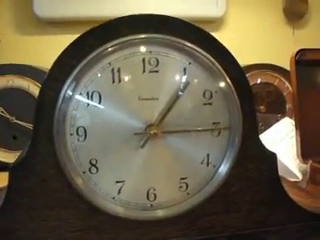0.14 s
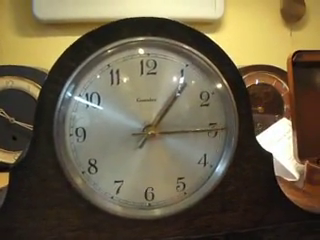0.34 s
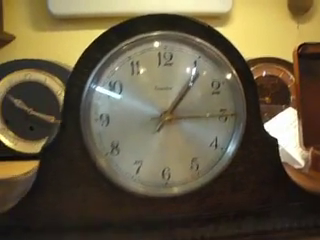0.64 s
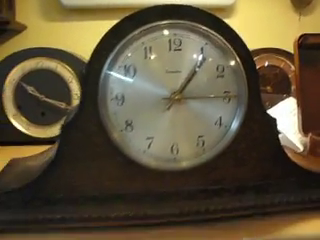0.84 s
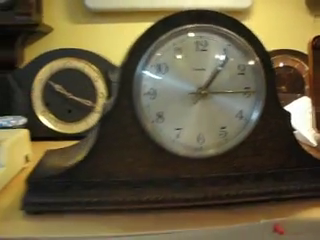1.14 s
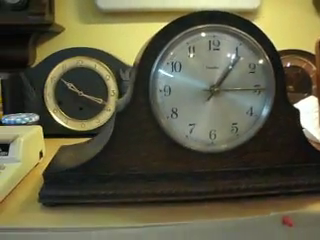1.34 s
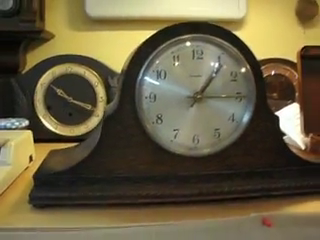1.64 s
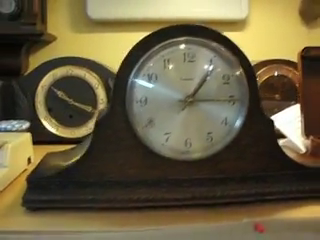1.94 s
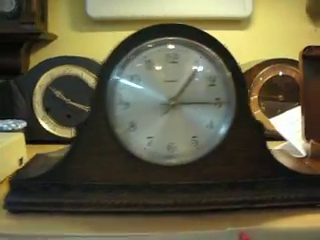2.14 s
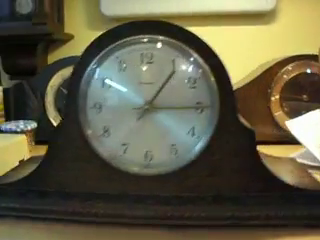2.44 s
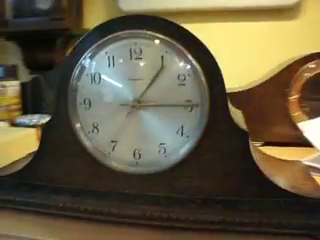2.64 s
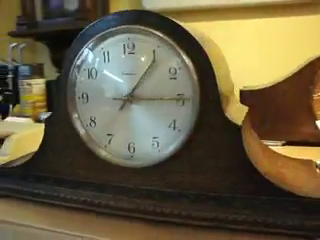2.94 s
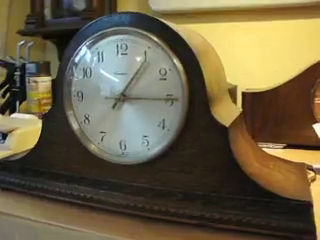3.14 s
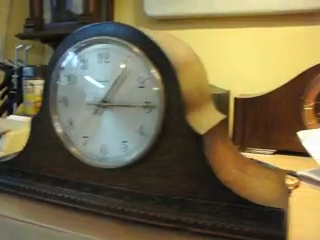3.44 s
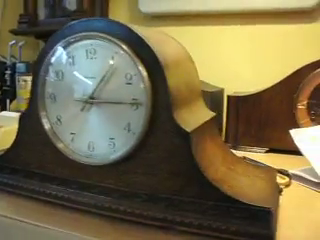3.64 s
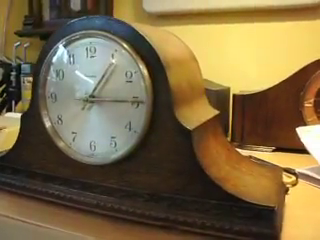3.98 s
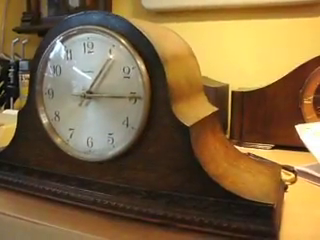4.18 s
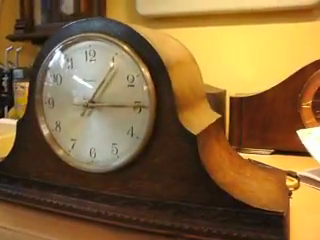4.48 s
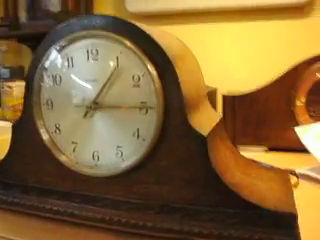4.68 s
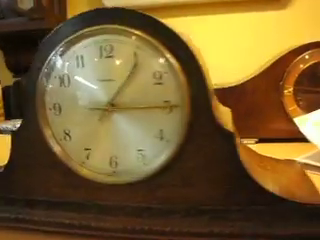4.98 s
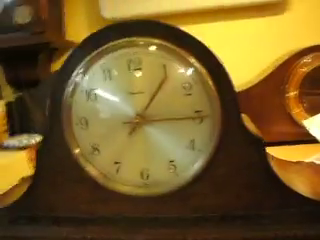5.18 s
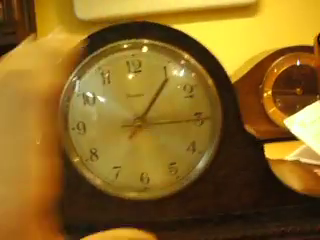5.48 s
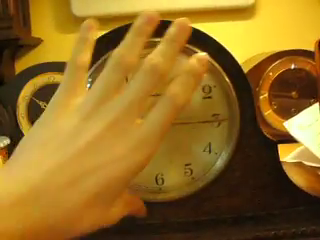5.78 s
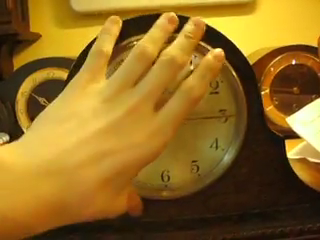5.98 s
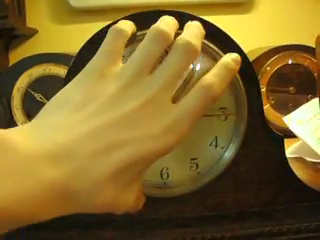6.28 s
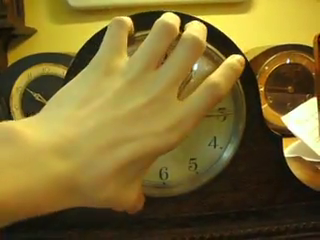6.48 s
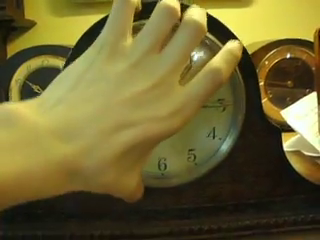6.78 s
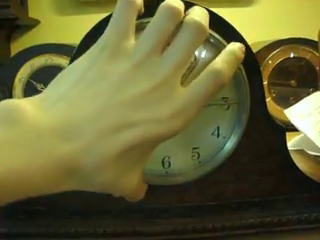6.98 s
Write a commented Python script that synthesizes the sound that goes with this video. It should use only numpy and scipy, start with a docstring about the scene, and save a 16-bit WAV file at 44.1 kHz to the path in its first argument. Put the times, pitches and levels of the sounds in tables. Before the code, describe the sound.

Quick, overlapping, echoey ticks run throughout, wooden and steely, with faint dull shuffles behind. A sharp clack a third of the way in leaves a short room tail. Later a cluster of very close, crisp snaps and scratchy rubs ends in a tiny judder. Soft hollow taps on glass precede a loud woody knock with rattling bezel and faint gong-rod ring. Band-limited handheld microphone, constant hiss.

```python
"""Several mantel clocks tick out of step throughout: decaying noise and ringing modes, over steady hiss and hum.
Dull shuffles of band noise begin in the room, then a hard clack sounds further off with its room tail.
Fingers click and rub close to the microphone: damped resonances, and stick-slip grains along each stroke.
Fingertips tap the glass of the nearest clock as short hollow pings with a little echo; last, a hand
knocks its door, whose modes and loose bezel sound at once while the gong rods ring on faintly."""
import sys
import numpy as np
from scipy import signal
from scipy.fft import rfft, irfft
from scipy.io import wavfile

SR = 44100
rng = np.random.default_rng(int(sys.argv[2]) if len(sys.argv) > 2 else 0)


def put_to_file(sound):
    """Save the sound as 16-bit audio at rate SR, in the file named by the first command-line argument."""
    columns = np.atleast_2d(sound).T  # one column per channel
    safe = np.clip(columns, -1, 1)
    whole_steps = np.round(safe * 32767)
    wavfile.write(sys.argv[1], SR, whole_steps.astype(np.int16))


N = 313992
TIME = np.arange(N) / SR

# Spectrum of the wooden case's tick. Each row: frequency in Hz, relative density in dB per Hz.
TICK_CASE_COLOUR = [(200, -25), (600, -7), (1300, -6.5), (1900, -5), (2500, 0.5), (2900, -3.5), (3400, -24)]
# Spectrum of the steel works' tick. Each row: frequency in Hz, relative density in dB per Hz.
TICK_STEEL_COLOUR = [(1500, -19), (2600, -16), (3100, 3), (3700, 2.5), (4000, -3), (4300, -1)]
# Sharp resonances of the clock works. Each row: frequency in Hz, relative level in dB, 60 dB decay in s.
WORKS_MODES = [(2345, -1.5, 0.059), (2464, -2, 0.048), (2630, 0.5, 0.15), (2910, 4.5, 0.028)]


def clocks(pitched_db=-9.0, pitched_t60=0.27, pitched_rise_s=0.0061, width_hz=700):
    """Impulsive excitation: each beat rings a pitched case and the steel works, heard mostly as room echo."""
    ticks = beats()
    times, case_db, steel_db, _ = np.transpose(ticks)
    works = rms_one(ring(rng.standard_normal(N), WORKS_MODES))
    case_wash = noise(TICK_CASE_COLOUR) + from_db(-5.5) * works
    out = from_db(-9) * dying(taps(times, case_db), t60=0.39, rise_s=0.0026) * case_wash
    out += from_db(-3) * dying(taps(times, steel_db), t60=0.31, rise_s=0.0023) * noise(TICK_STEEL_COLOUR)

    # a narrow band of noise at the case pitch of each beat
    t = TIME[:SR // 2]
    swell = (1 - np.exp(-t / pitched_rise_s)) * from_db(-60 * t / pitched_t60)
    whites = rng.standard_normal((len(ticks), len(t)))
    for (at, db, _, hz), white in zip(ticks, whites):
        band = band_noise(white, hz - width_hz / 2, hz + width_hz / 2)
        tick = from_db(db + pitched_db) * swell * rms_one(band)
        start = max(int(at * SR), 0)
        out[start:start + len(t)] += tick[:N - start]
    return out


# The clocks, each at its own steady rate. Each row: first tick in seconds, full swing in seconds,
# tick to tock in seconds, relative tick level in dB, relative tock level in dB,
# steel ring over case ring in dB, case pitch in Hz.
CLOCKS = [(0.2755, 0.602, 0.301, -29.5, -28.5, -8.5, 2350), (0.671, 1.522, 0.76, -29.5, -42.5, -2.5, 2700),
          (-0.004, 1.512, 0.757, -34, -43, 1, 2650), (0.008, 0.73, 0.592, -35.5, -37, -7.5, 2400)]
# Further single ticks, loud and soft, at irregular times. Each row: start in seconds, relative level in dB,
# steel ring over case ring in dB, case pitch in Hz.
SINGLE_TICKS = [(0.487, -31.5, -5, 2080), (0.8485, -28.5, -5, 1830), (1.722, -35, -4, 1950),
                (1.9135, -34, -4, 2550), (2.5381, -32, -5, 2370), (2.653, -31, -4, 1810),
                (2.7667, -33.5, -8, 1840), (3.5395, -25.5, -3, 3150), (3.6713, -29, -6.5, 2340),
                (3.92, -28, -4.5, 2670), (4.1207, -29.5, -5, 2650), (4.2684, -34, -1.5, 2490)]
# Level of all the ticking as the microphone moves about. Each row: time in seconds, gain in dB.
TICKING_GAIN = [(0.1, -0.5), (0.7, 2), (1.3, -0.5), (1.8, -1.5), (2.1, 1), (2.8, 0.5), (3.7, -1),
                (4.3, 0.5), (5.4, -0.2), (5.7, -3), (6.05, -0.5), (6.3, -1.5), (6.6, 0.5)]


def beats(uneven_db=0.6):
    """Periodic motion: tick and tock recur at fixed intervals; rows of s, case dB, steel dB, pitch Hz."""
    rows = list(SINGLE_TICKS)
    for first, swing, tock_s, tick_db, tock_db, steel_db, hz in CLOCKS:
        # each tick and tock of a clock differs a little in strength
        for k, (tick_uneven, tock_uneven) in enumerate(rng.normal(0, uneven_db, size=(13, 2))):
            tick_at = first + k * swing
            rows.append((tick_at, tick_db + tick_uneven, steel_db, hz))
            rows.append((tick_at + tock_s, tock_db + tock_uneven, steel_db, hz))
    heard = [row for row in rows if row[0] < TIME[-1]]
    times, db, steel_db, hz = np.transpose(heard)
    db = db + np.interp(times, *np.transpose(TICKING_GAIN))
    return np.transpose([times, db, db + steel_db, hz])


# Hand on the glass door. Each row: start in seconds, then the relative levels of ring, rattle
# and low thump in dB.
KNOCKS = [(6.7848, -6.3, -9, -44), (6.8022, -2.8, -7.5, -11), (6.8062, -7.5, -7.5, -8.5)]
# Door and wooden case. Each row: frequency in Hz, relative level in dB, 60 dB decay in seconds.
DOOR_MODES = [(377, -22, 0.77), (461.6, -21, 0.27), (622, -19.5, 0.24), (656, -12, .22), (677, -17, .25),
              (748, -15, 0.12), (806, -5.5, 0.1), (847, -5, .14), (925, -9, 0.14), (1220, -26, 0.2),
              (1270, -25, 0.16), (1464, -18, 0.061), (1810, -26, 0.2), (2110, -27, 0.16),
              (2280, -23.5, 0.206), (2920, -26, 0.22)]
# Spectrum of the loose bezel. Each row: frequency in Hz, relative density in dB per Hz.
RATTLE_COLOUR = [(70, -27), (200, -11), (450, -2), (750, 4), (1100, 0.5), (1800, 1.5), (2800, -1),
                 (4200, -5.5)]
# Boom of the hollow case in the room. Each row: frequency in Hz, relative density in dB per Hz.
BOOM_COLOUR = [(120, -19), (190, -5.5), (300, -8), (390, 4.5), (470, -2), (530, -21), (680, 4), (900, -3.5),
               (1050, -12), (1300, -11), (1600, -20)]
# Gong rods shaken by the last knock. Each row: frequency in Hz, level in dB, 60 dB decay in seconds.
GONG_MODES = [(420, -33.5, 1.1), (837, -37, 1.9), (1053, -43, 2.2), (1314, -35, 0.67), (2110, -42.5, 2.3)]


def door():
    """Modal excitation: a knock rings glass, case and gong rods, rattles the bezel and is answered by the room."""
    times, ring_db, rattle_db, thump_db = np.transpose(KNOCKS)
    body = ring(taps(times, ring_db), DOOR_MODES) + thump(taps(times, thump_db), width_s=0.0018)
    rattle_force = taps(times, rattle_db)
    rattle = dying(rattle_force, t60=0.06, rise_s=0.0011) * noise(RATTLE_COLOUR)
    tail = from_db(-17.0) * dying(rattle_force, t60=0.48, rise_s=0.0053) * noise(RATTLE_COLOUR)
    boom = from_db(-23) * dying(taps(times, ring_db), t60=0.41, rise_s=0.006) * noise(BOOM_COLOUR)
    gong = ring(taps(times[-1:], 0), GONG_MODES)
    return body + rattle + tail + boom + gong


# Fingertips landing on the glass, which they damp. Each row: start in seconds, level in dB, pitch in Hz.
TOUCHES = [(6.1458, -21, 834), (6.1535, -30, 800), (6.7345, -33, 790), (6.757, -18, 713),
           (6.762, -14.5, 850), (6.767, -26, 680)]
# Echo of a fingertip on the glass. Each row: frequency in Hz, relative density in dB per Hz.
TOUCH_COLOUR = [(90, -11.5), (350, -3), (800, 3.5), (1300, -3), (1900, -12)]


def fingertips(swell_s=0.0022, echo_db=-14):
    """Heavy damping: soft pads give the glass only a short hollow tap and a little echo."""
    times, level_db, _ = np.transpose(TOUCHES)
    direct = sum(ping(at, hz, db, swell_s) for at, db, hz in TOUCHES)
    echo = dying(taps(times, level_db), t60=0.28, rise_s=0.0016) * noise(TOUCH_COLOUR)
    return direct + from_db(echo_db) * echo


# Dry clicks of the grip next to the microphone. Each row: start in seconds, snap pitch in Hz,
# snap level in dB, body pitch in Hz, body level in dB.
CLICKS = [(3.2077, 1680, -11, 840, -16.5), (3.2087, 3500, -15, 2260, -21),
          (3.2168, 3300, -14.5, 700, -27.5), (3.408, 2940, -22, 1710, -38), (4.638, 3400, -19, 1200, -24),
          (4.6648, 2000, -9, 840, -10.5), (4.667, 3460, -8.5, 1500, -12.5), (4.681, 2740, -8, 1070, -14),
          (4.7123, 2700, -21, 1100, -32), (4.7395, 2850, -10, 1090, -19), (4.9036, 3480, -20.5, 1200, -37),
          (4.9488, 3080, -23, 1900, -29.5), (4.982, 3060, -12, 1700, -24), (5.005, 3080, -13, 2100, -20)]
# Low thumps as the loudest clicks overload the microphone. Each row: start in seconds, relative level in dB.
THUMPS = [(4.665, -12.5), (4.6814, -38), (4.7395, -43), (5.0487, -32.5)]


def grip_clicks(snap_s=0.00054, body_s=0.00097, edge_db=-7, edge_hz=3900, edge_s=0.00045):
    """Sudden release: the shell in the hand snaps in short sharp-edged clicks, pitched by where it gives."""
    out = np.zeros(N)
    for at, snap_hz, snap_db, body_hz, body_db in CLICKS + judder():
        out += ping(at, snap_hz, snap_db, snap_s)
        out += ping(at, body_hz, body_db, body_s)
        out += ping(at, edge_hz, snap_db + edge_db, edge_s)
    return out + thump(taps(*np.transpose(THUMPS)), width_s=0.0023)


# the grip judders in a quick run of clicks as the last stroke ends
JUDDER_START_S, JUDDER_GAP_S, JUDDER_LOSS_DB = 5.0444, 0.0045, 1.2
# centres of the snap and body, varied from click to click
JUDDER_SNAP_HZ, JUDDER_SNAP_DB, JUDDER_BODY_HZ, JUDDER_BODY_DB = 3190, -7.5, 1000, -23


def judder(count=4):
    """Repeated release: evenly spaced snaps, each a little weaker; rows as in CLICKS."""
    rows = []
    for k, (detune, shift, uneven) in enumerate(rng.standard_normal((count, 3))):
        at = JUDDER_START_S + k * JUDDER_GAP_S
        snap_hz = JUDDER_SNAP_HZ * (1 + 0.02 * detune)
        snap_db = JUDDER_SNAP_DB - k * JUDDER_LOSS_DB
        body_hz = JUDDER_BODY_HZ * 2 ** (0.47 * shift)
        rows.append((at, snap_hz, snap_db, body_hz, JUDDER_BODY_DB + 2 * uneven))
    return rows


# Spectrum of the friction. Each row: frequency in Hz, relative density in dB per Hz.
RUB_COLOUR = [(200, -19), (900, -7.5), (1900, -8.5), (2500, -5), (3100, -5.5), (3700, -6.5), (4300, -2)]
# Resonances of the grip under a sliding finger. Each row: frequency in Hz, relative level in dB,
# 60 dB decay in seconds.
RUB_MODES = [(2880, -1.5, 0.005), (3250, -0.5, .008), (3710, -3, 0.0056)]
# the skin catches now and then: rate, level over the friction, spread of levels and pitch
CATCHES_PER_S, CATCH_DB, CATCH_SPREAD_DB, CATCH_HZ = 70, 4, 3, 3150


def grip_rub(slips_per_s=2000, spread_db=3.0, scrape_db=-4, ring_db=-2, catch_s=0.00041):
    """Stick-slip friction: dense uneven grains set the grip ringing, and stray catches add small snaps."""
    slips = (rng.random(N) < slips_per_s / SR) * rng.choice([-1, 1], N)
    slips = slips * from_db(spread_db * rng.standard_normal(N))
    scrape = from_db(scrape_db) * coloured(slips, RUB_COLOUR)
    ringing = from_db(ring_db) * rms_one(ring(slips, RUB_MODES))
    catches = (rng.random(N) < CATCHES_PER_S / SR) * from_db(CATCH_SPREAD_DB * rng.standard_normal(N))
    snap = ping(0, CATCH_HZ, CATCH_DB, catch_s)[:SR // 20]
    snaps = signal.fftconvolve(catches, snap)[:N]
    return friction() * (rms_one(scrape + ringing) + snaps)


# Strokes of skin sliding on the grip. Each row: start in seconds, length in seconds,
# friction at the start in dB, friction at the end in dB.
STROKES = [(4.395, 0.083, -32, -25), (4.636, 0.065, -26, -34.5), (4.71, 0.057, -36, -31.5),
           (4.773, 0.022, -26.5, -22), (4.801, 0.045, -26.5, -32.5), (4.851, 0.031, -32, -25.5),
           (4.974, 0.03, -35.5, -33), (5.01, 0.051, -28, -21.5)]
# the attack leads up to the start; the release is a time constant
STROKE_ATTACK_S, STROKE_RELEASE_S = 0.005, 0.0043


def friction():
    """Sliding contact: each stroke takes hold quickly, grows or fades evenly in dB and lets go."""
    out = np.zeros(N)
    for start, length, first_db, last_db in STROKES:
        t = TIME - start
        attack = np.clip(t / STROKE_ATTACK_S + 1, 0, 1)
        release = np.exp(-np.clip((t - length) / STROKE_RELEASE_S, 0, 20))
        level = from_db(np.interp(t, [0, length], [first_db, last_db]))
        out = np.maximum(out, attack * release * level)
    return out


# A hard clack across the room. Each row: start in seconds, relative level in dB.
CLACKS = [(2.263, -29.5), (2.2716, -16.5), (2.321, -26)]
# Spectrum of the clack. Each row: frequency in Hz, relative density in dB per Hz.
CLACK_COLOUR = [(70, -30), (250, -11.5), (700, -0.5), (1300, -1.5), (1900, 3), (2400, -3), (2900, 4.5),
                (4200, -5)]
# Soft shuffles in the room. Each row: start in seconds, relative level in dB, centre of the band in Hz.
SHUFFLES = [(0.502, -37, 703), (0.987, -44, 283), (1.035, -39, 475), (2.05, -46.5, 357), (2.765, -36, 827),
            (2.86, -46.5, 300), (3.49, -40, 1010), (4.243, -36, 988), (5.14, -41.5, 755)]


def room_noises():
    """Reverberation: a hard clack decays fast and then in a room tail; dull shuffles die away likewise."""
    force = taps(*np.transpose(CLACKS))
    crack_envelope = dying(force, t60=0.044, rise_s=0.00025)
    crack_envelope += from_db(1.0) * dying(force, t60=0.0075, rise_s=0.0002)
    crack = crack_envelope * noise(CLACK_COLOUR)
    tail = from_db(-5.5) * dying(force, t60=0.4, rise_s=0.006) * noise(CLACK_COLOUR)
    white, shuffles = rng.standard_normal(N), np.zeros(N)
    for at, db, hz in SHUFFLES:
        band = band_noise(white, hz / 1.47, hz * 1.45)
        shuffles += dying(taps([at], db), t60=0.36, rise_s=0.0091) * rms_one(band)
    return crack + tail + shuffles


# Steady hiss of room and microphone. Each row: frequency in Hz, relative density in dB per Hz.
HISS_COLOUR = [(60, -23), (100, -21), (160, -16.5), (240, -8), (350, -5.5), (480, -4), (620, -0.5),
               (950, -0.5), (1300, -4.5), (1900, -4), (2600, -4.5), (3750, -8.5), (3980, -13), (4300, -12)]
# Faint steady hum. Each row: frequency in Hz, rms level in dB.
HUM = [(188.4, -64.5), (241.5, -65), (312.2, -62), (807.5, -58)]


def background(hiss_db=-40, fade_db=-0.8):
    """Stationary noise and pure tones: the hiss sinks a little as the microphone nears the case."""
    hum = np.zeros(N)
    for hz, db in HUM:
        hum += from_db(db) * np.sqrt(2) * np.sin(2 * np.pi * (hz * TIME + rng.random()))
    shade_db = np.interp(TIME, [5.2, 5.6], [0, fade_db])
    return from_db(hiss_db + shade_db) * noise(HISS_COLOUR) + hum


def from_db(db):
    """Logarithmic level: decibels to amplitude gain."""
    return 10 ** (np.asarray(db) / 20)


def rms_one(x):
    """Normalisation: scale to unit mean power."""
    return x / np.sqrt(np.mean(x ** 2) + 1e-20)


def coloured(x, colour):
    """Spectral shaping: weight x by a colour that falls away beyond its end points; rms 1."""
    hz, db = np.transpose(colour)
    octave = np.log2(np.arange(N // 2 + 1) * SR / N + 1)
    known = np.log2(hz)
    outside = np.abs(octave - np.clip(octave, known[0], known[-1]))
    gain_db = np.interp(octave, known, db) - 13.2 * outside  # dB per octave outside
    return rms_one(irfft(rfft(x) * from_db(gain_db), N))


def noise(colour):
    """Random excitation: steady Gaussian noise of a given colour."""
    return coloured(rng.standard_normal(N), colour)


def band_noise(white, low_hz, high_hz):
    """Band limitation: keep the noise between two frequencies."""
    return signal.sosfilt(signal.butter(2, [low_hz, high_hz], "band", fs=SR, output="sos"), white)


def taps(times, levels_db):
    """Impulsive force: one impulse per contact."""
    out = np.zeros(N)
    out[np.clip(np.asarray(times) * SR, 0, N - 1).astype(int)] = from_db(levels_db)
    return out


def ring(force, modes):
    """Modal superposition: damped modes of alternating sign that radiate no steady pressure."""
    out = np.zeros(N)
    for k, (hz, db, t60) in enumerate(modes):
        radius = from_db(-60 / (t60 * SR))
        angle = 2 * np.pi * hz / SR
        poles = [1, -2 * radius * np.cos(angle), radius * radius]
        out += (-1) ** k * from_db(db) * signal.lfilter([.5, 0, -.5], poles, force + 1e-18)
    return out


def dying(force, t60, rise_s):
    """Diffuse-field decay: the energy of each contact builds up and dies away; returns the amplitude."""
    keep = from_db(-120 / (t60 * SR))  # energy kept per sample
    lag = np.exp(-1 / (rise_s * SR))
    energy = signal.lfilter([1], [1, -keep], force ** 2 + 1e-18)
    return np.sqrt(signal.lfilter([1 - lag], [1, -lag], energy))


def thump(impulses, width_s):
    """Overload pulse: a blunt one-sided low thump."""
    pulse = np.sin(np.pi * np.minimum(TIME[:SR // 20] / width_s, 1)) ** 2
    return -signal.fftconvolve(impulses, pulse)[:N]


def ping(at, hz, db, swell_s):
    """Damped resonance: a tone whose envelope peaks after swell_s and then dies."""
    out, start = np.zeros(N), int(at * SR)
    t = TIME[:SR // 8][:N - start]
    envelope = t / swell_s * np.exp(1 - t / swell_s)
    out[start:start + len(t)] = from_db(db) * envelope * np.sin(2 * np.pi * hz * t)
    return out


def scene():
    """Linear superposition: all sources add at one microphone."""
    near = clocks() + door() + fingertips() + grip_clicks() + grip_rub()
    return (near + room_noises() + background())[None]


VOICE_BAND_HZ, CUTOFF_HZ = 4047, 16000


def record(dry, ceiling=0.88, converter_db=-98, offset=0.006):
    """Saturation and band limitation: peaks round off, the band narrows, the converter clips and rests off zero."""
    rounded = dry / (1 + (dry / ceiling) ** 4) ** (1 / 4)
    voice_filter = signal.firwin(161, VOICE_BAND_HZ, window=("kaiser", 8), fs=SR)
    narrow = signal.fftconvolve(rounded, voice_filter[None], "same")
    clipped = np.clip(narrow, -0.69, 0.69)
    converted = clipped + from_db(converter_db) * rng.standard_normal(N) + offset  # faint converter hiss
    return signal.sosfilt(signal.cheby2(12, 70, CUTOFF_HZ, fs=SR, output="sos"), converted)


dry = scene()
out = record(dry)
put_to_file(out)
```